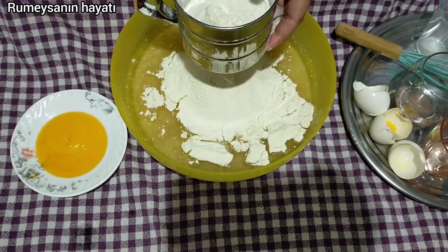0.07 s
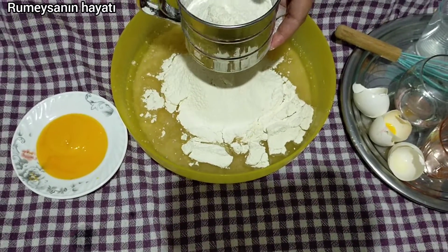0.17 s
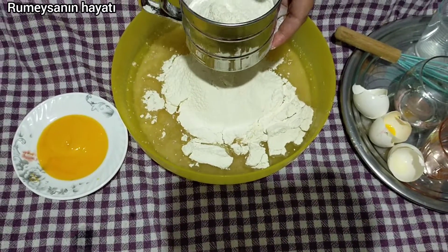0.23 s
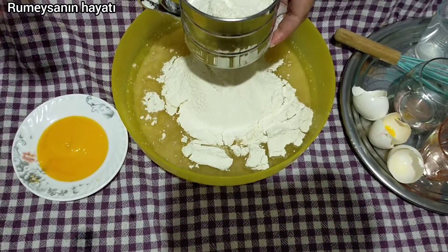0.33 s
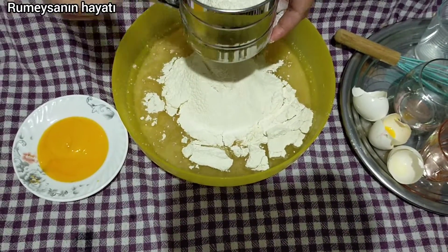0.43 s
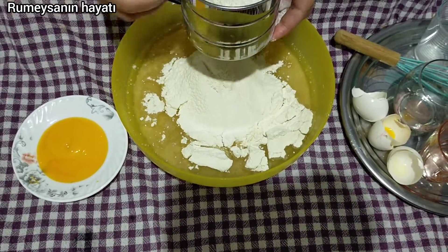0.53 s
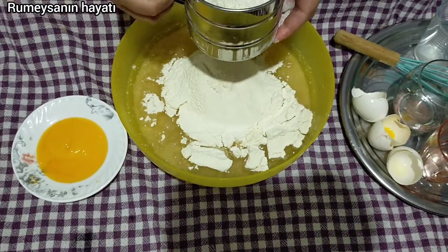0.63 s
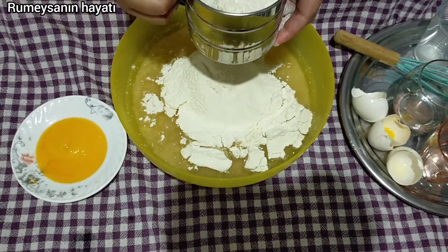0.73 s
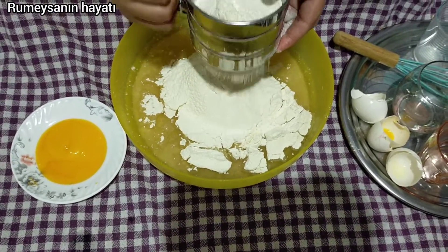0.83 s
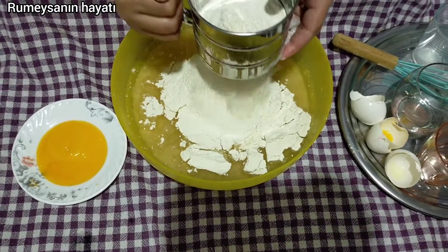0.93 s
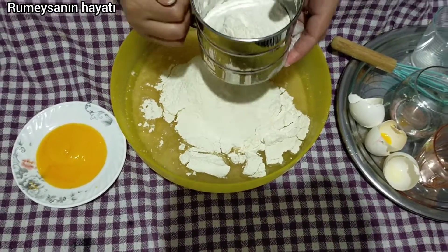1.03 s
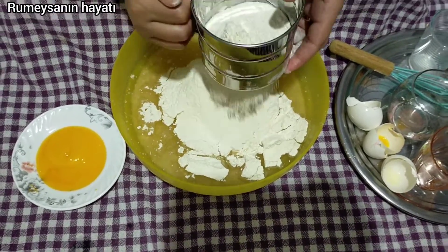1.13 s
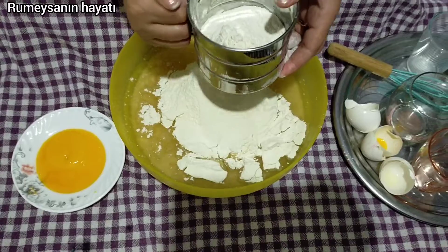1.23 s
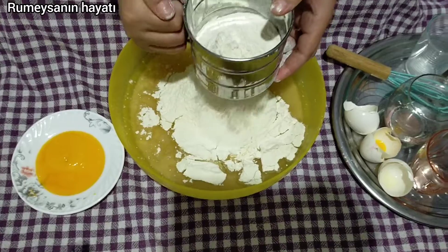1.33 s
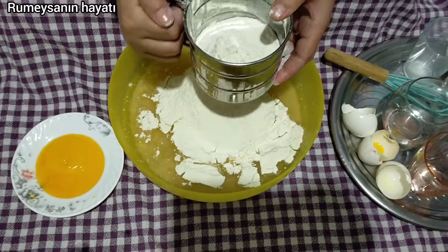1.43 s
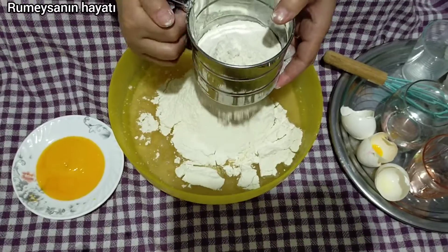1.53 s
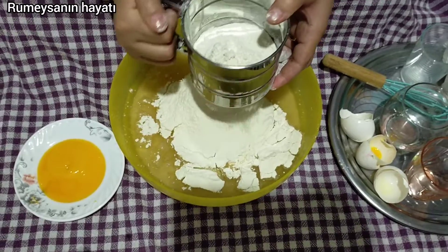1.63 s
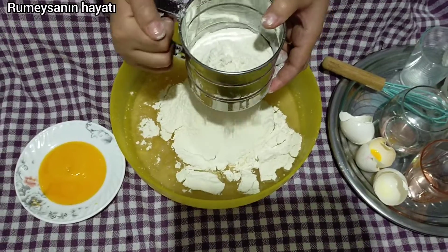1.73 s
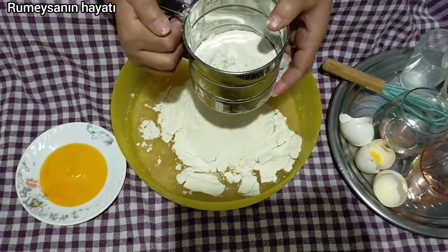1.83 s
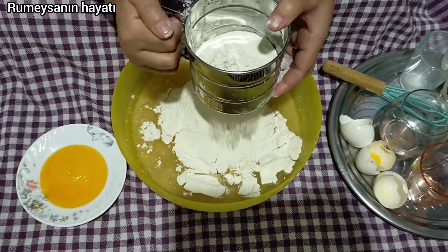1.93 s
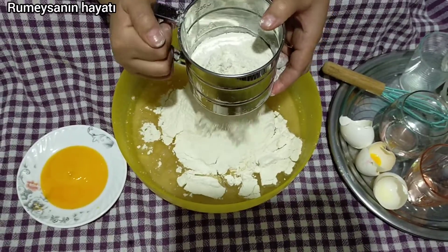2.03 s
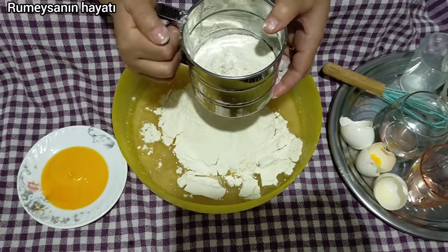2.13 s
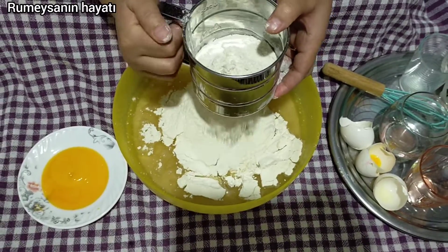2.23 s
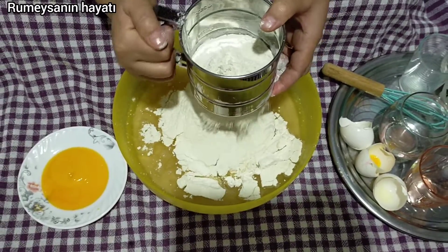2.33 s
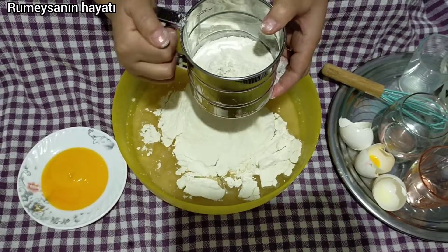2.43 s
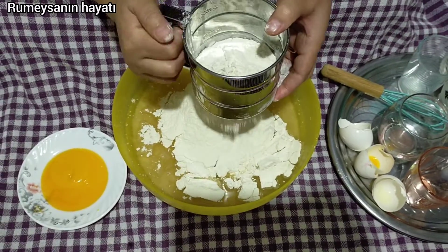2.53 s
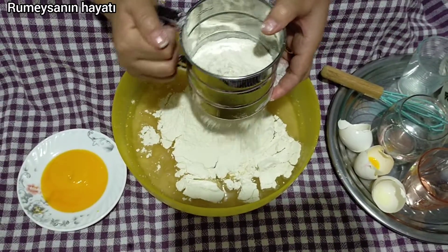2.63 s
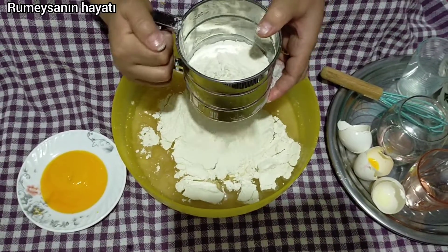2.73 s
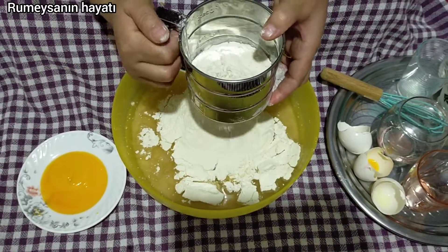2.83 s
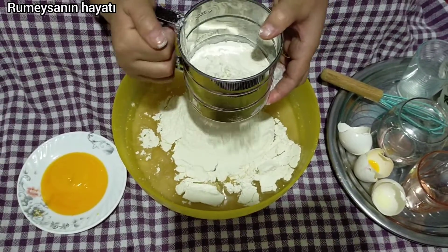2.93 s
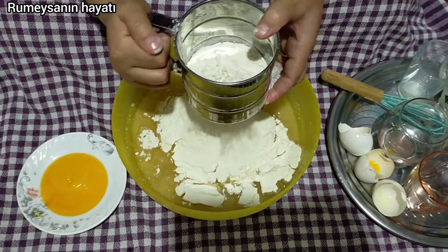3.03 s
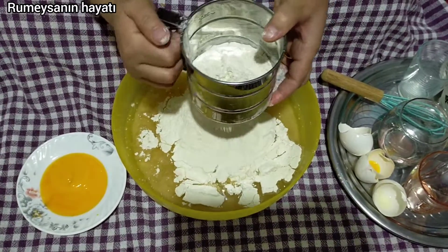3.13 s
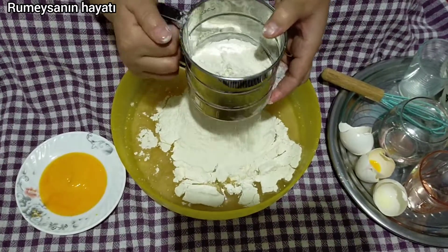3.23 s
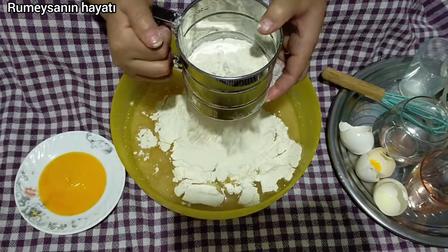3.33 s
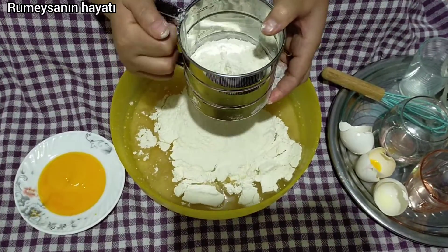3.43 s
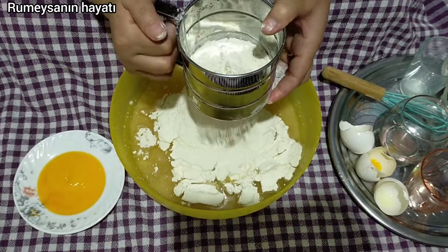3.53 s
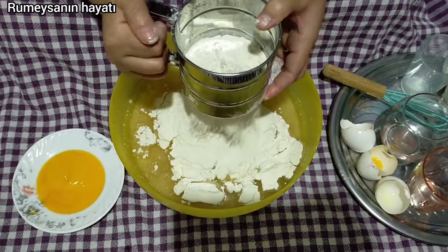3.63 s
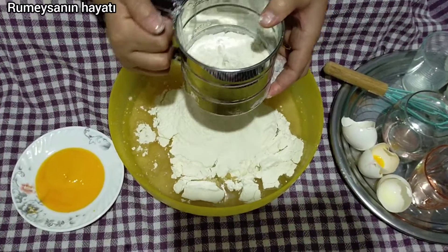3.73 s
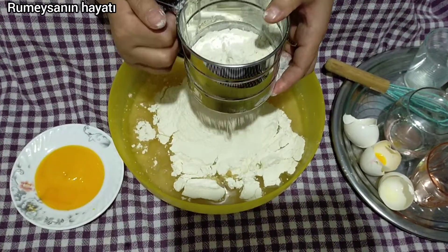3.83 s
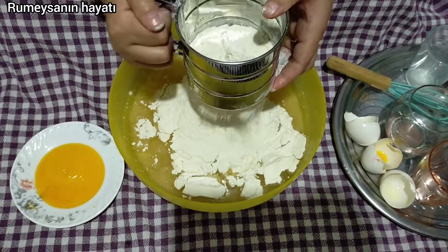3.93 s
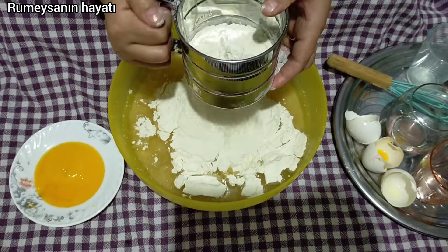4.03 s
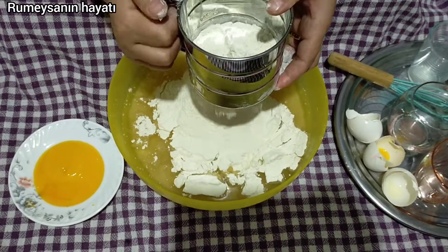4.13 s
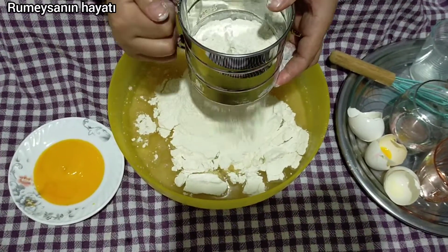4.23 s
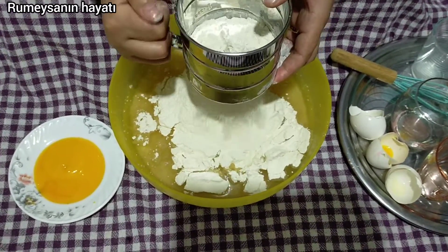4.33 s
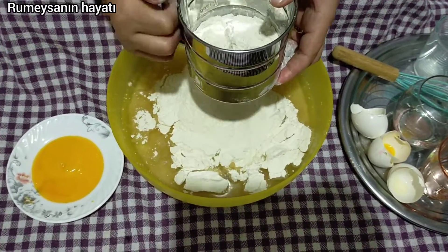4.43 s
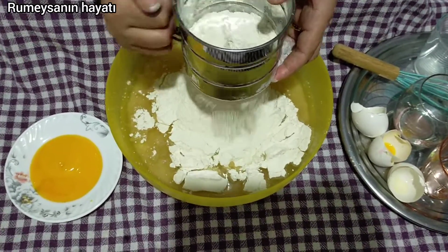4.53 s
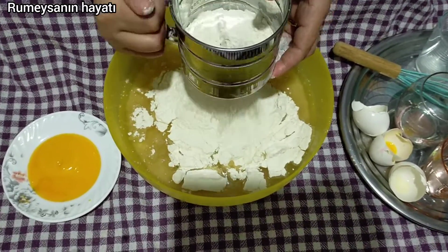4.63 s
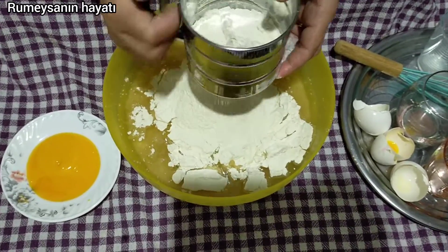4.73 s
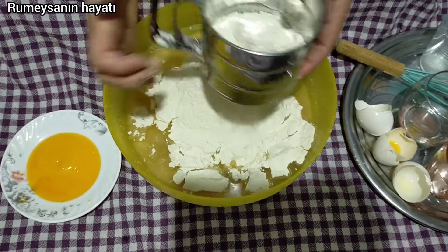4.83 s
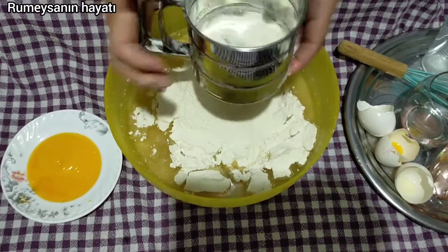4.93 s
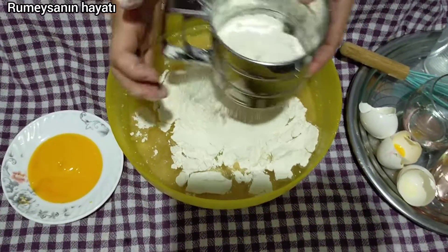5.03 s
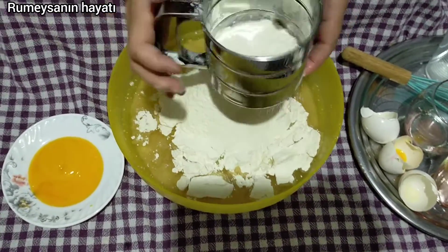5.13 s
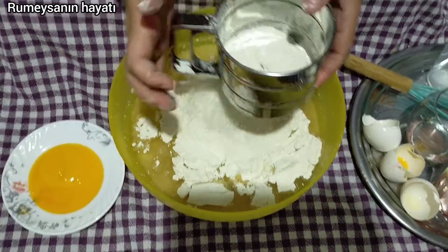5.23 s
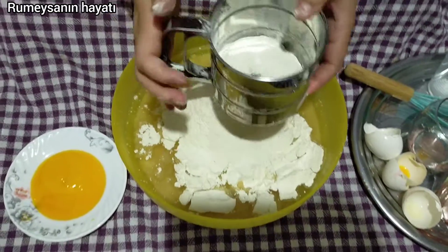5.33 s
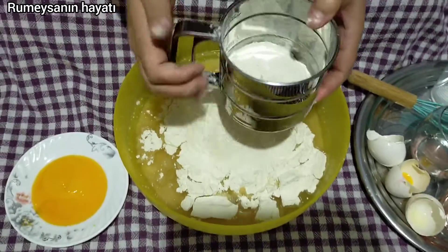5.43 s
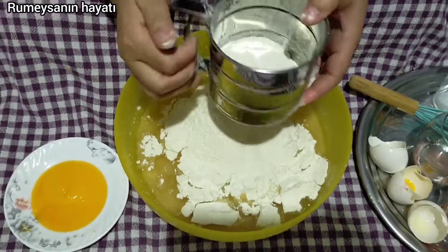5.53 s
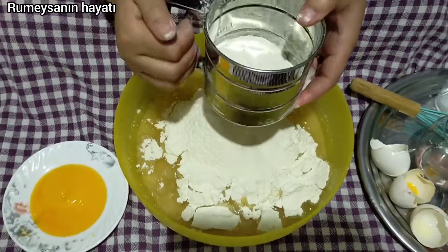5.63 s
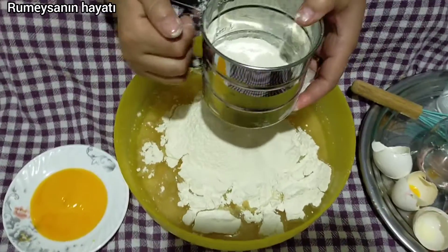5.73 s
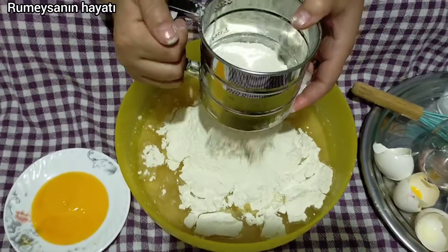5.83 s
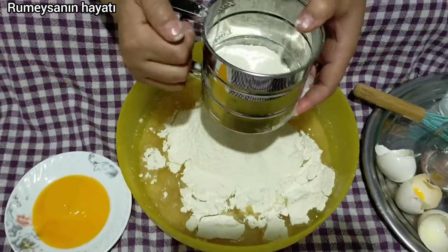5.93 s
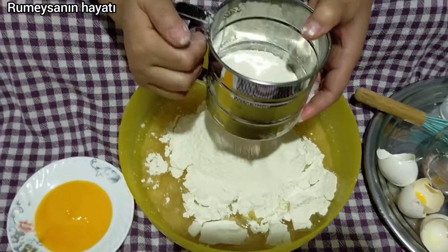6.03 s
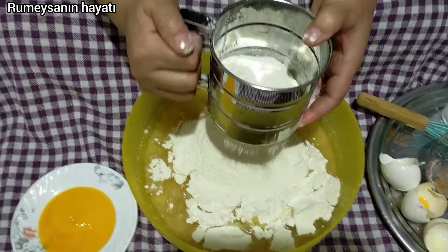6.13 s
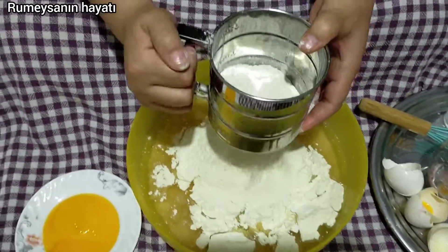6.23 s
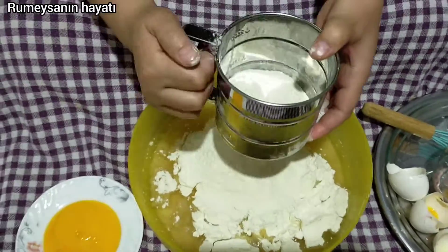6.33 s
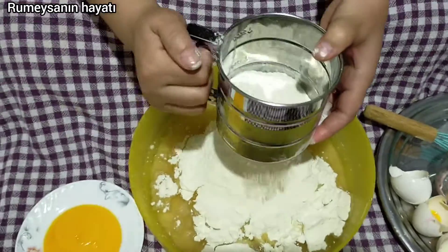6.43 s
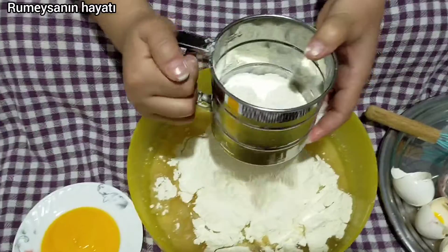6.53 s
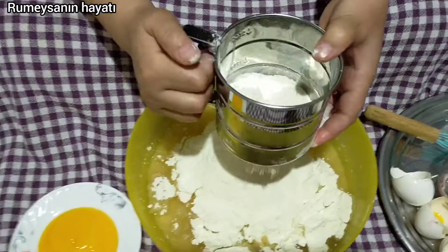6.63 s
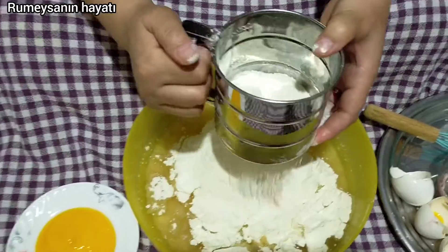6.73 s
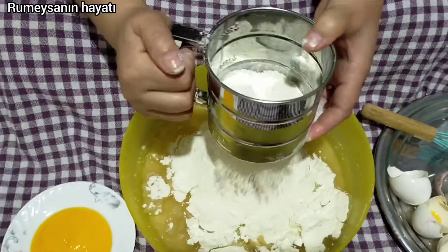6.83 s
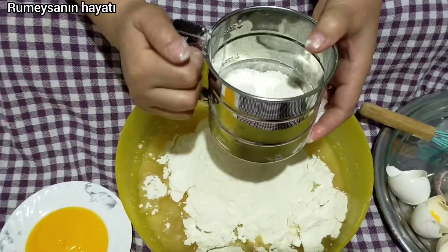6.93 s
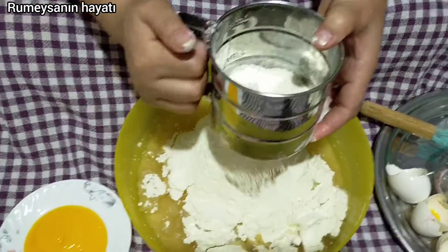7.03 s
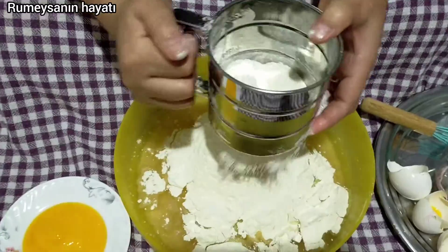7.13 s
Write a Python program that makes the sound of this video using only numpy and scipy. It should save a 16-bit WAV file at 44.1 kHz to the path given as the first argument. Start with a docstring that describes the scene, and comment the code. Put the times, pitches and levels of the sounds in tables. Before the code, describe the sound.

Close up in a small kitchen, fingers faintly knock and rub a steel flour sifter. Then the handle is squeezed about three times a second, each squeeze a sharp click and short gritty rasp of blades on wire mesh, each spring return softer. The rhythm stops for about a second with a few loose ticks, then resumes with snappier returns. Short wall echoes and a quiet low hum with soft hiss surround it.

```python
"""Fingers knock, rub and squeak faintly on a steel flour sifter in a small kitchen, over a low hum.
Then each squeeze of the handle clicks the lever and whips blades across the wire mesh with a rasp;
the spring drags them back more softly. The hand lets go once and the loose handle ticks.
Tiny random friction slips ring the steel parts, and wall echoes follow. The hum is a few low tones,
over filtered-noise rumble and hiss."""
import sys
import numpy as np
from scipy import signal
from scipy.fft import rfft, irfft, next_fast_len
from scipy.io import wavfile
from scipy.ndimage import uniform_filter1d

SR = 44100
rng = np.random.default_rng(int(sys.argv[2]) if len(sys.argv) > 2 else 0)


def unload_audio(sound):
    """Save the sound as a 16-bit wav file, at the path given as the first command line argument."""
    columns = np.transpose(np.atleast_2d(sound))
    # keep every value between -1 and 1, then stretch to whole-number steps
    steps = np.round(np.clip(columns, -1, 1) * 32767)
    wavfile.write(sys.argv[1], SR, steps.astype(np.int16))


N = 316197
TIME = np.arange(N) / SR   # seconds

# Squeezes click the lever, then whip the blades round: click_s, click_level_db, run_up_to_top_speed_s, rasp_level_db
SQUEEZES = [(0.841, -38, 0.052, -34.5), (1.287, -35.5, 0.028, -35), (1.661, -40.5, .028, -38),
            (2.002, -41, 0.031, -36.5), (2.329, -38, 0.026, -35.5), (2.647, -37.5, 0.026, -36),
            (2.964, -34, 0.027, -35.5), (3.294, -32, 0.025, -36), (3.617, -34, 0.025, -36.5),
            (3.942, -30.5, 0.026, -36.5), (4.261, -32, .026, -35.5), (4.557, -28.5, 0.021, -33.5),
            (5.809, -40.5, 0.039, -40.5), (6.162, -34, .026, -35), (6.476, -37.5, .028, -35.5),
            (6.805, -36.5, 0.03, -36), (7.126, -34.5, 0.031, -36)]
# The spring drags lever and blades back: click_s, click_level_db, run_up_to_top_speed_s, rasp_level_db
RETURNS = [(1.065, -69, 0.057, -47), (1.506, -54, 0.042, -47), (1.863, -43.5, 0.03, -44.5),
           (2.179, -52, 0.032, -44), (2.519, -49, 0.033, -44.5), (2.839, -48, 0.032, -45),
           (3.135, -41.5, 0.035, -44), (3.487, -49, 0.033, -44), (3.803, -53, 0.036, -44.5),
           (4.131, -40.5, 0.031, -43), (4.445, -36.5, 0.039, -44), (4.743, -50, .036, -42),
           (6.012, -40.5, 0.036, -45.5), (6.357, -49, 0.038, -42.5), (6.674, -53, 0.042, -41.5),
           (6.987, -47.5, 0.033, -42.5)]
# The slack linkage ticks just before some strokes: start_s, level_db
SLACK_TICKS = [(1.648, -49), (1.848, -56), (2.167, -50), (2.502, -53), (3.113, -49), (3.782, -57),
               (4.428, -46.5)]
# With the new grip the returning lever snaps against its stop: start_s, level_db
STOP_SNAPS = [(6.061, -32), (6.404, -25), (6.722, -37), (7.033, -31)]
# The loose handle ticks as the grip shifts: start_s, level_db
HANDLE_TICKS = [(5.004, -38.5), (5.198, -44), (5.378, -51)]
# Dry pivots squeak briefly: middle_s, mean_pitch_hz, peak_level_db, half_length_s
SQUEAKS = [(0.137, 1790, -63, 0.0034), (0.196, 2270, -66.5, 0.0084), (0.212, 5550, -74, 0.012),
           (0.904, 1462, -35.5, 0.0026)]
# Fingers knock on the cup: start_s, level_db
FINGER_KNOCKS = [(.048, -48.5), (.277, -45.5), (.621, -51)]
# The hand slides over cup and handle: middle_s, level_db, half_length_s
RUBS = [(0.0, -51, .02), (0.133, -64.5, 0.016), (5.123, -66.5, 0.11)]

# Ringing of the cup, damped by flour and hand: pitch_hz, width_hz, relative_level_db
CUP_MODES = [(322, 46, -18), (489, 73, -7), (645, 223, -3), (781, 120, 4), (907, 96, -0.5), (1117, 152, -4),
             (1347, 295, -6.5), (1563, 210, -4.5), (1735, 197, -5.5), (2077, 164, -9), (2300, 180, -12),
             (2930, 685, -18), (4170, 176, -24)]
# Ringing of mesh and wire linkage: pitch_hz, width_hz, relative_level_scraped_db, relative_level_clicked_db
WIRE_MODES = [(6510, 930, 0, -3.5), (7280, 920, 8, 4.5), (8135, 1240, 3, -2), (9660, 530, 3, 2),
              (10000, 4200, -3.5, -1.5), (13000, 540, 2, 1), (14740, 440, -2, -7)]
# Ringing of the free handle: pitch_hz, width_hz, relative_level_db
HANDLE_MODES = [(1450, 200, -6), (1880, 90, 3), (2150, 200, -4), (3000, 500, -19)]
# Ringing of the cup's wall under a finger: pitch_hz, width_hz, relative_level_db
WALL_MODES = [(345, 38, 4), (674, 140, 4.5), (1073, 145, 11), (1580, 240, -3.5), (1770, 220, -4),
              (2450, 79, 0.5)]
# Tone colour of skin on steel: frequency_hz, relative_level_per_hz_db
SKIN_COLOUR = [(100, -27), (330, -10), (700, -9), (1100, -10.5), (1600, -6.5), (2600, -16.5), (3800, -22.5),
               (5500, -33), (7800, -24), (10000, -42), (16000, -39)]

# Echoes against direct sound: frequency_hz, level_db
ECHO_LEVELS = [(200, -15), (800, -10.5), (1200, -7), (2000, 0.5), (3000, 6), (4500, 0), (7500, -11),
               (10000, -10.5), (16000, -8)]
# Time for echoes to fall by 60 dB: frequency_hz, decay_s
ECHO_DECAYS = [(200, 0.49), (1500, 0.29), (4000, 0.27), (8000, 0.24), (15000, .22)]
# Tones of the low hum: pitch_hz, mean_level_db
HUM_TONES = [(55.8, -60), (42, -71.5), (80.7, -75.5), (108.5, -77.5), (138.6, -84.5)]
# Tone colour of the rumble: frequency_hz, relative_level_per_hz_db
RUMBLE_COLOUR = [(8, -1.5), (16, -3.5), (30, -7.5), (70, -12.5), (100, -27), (250, -47), (1000, -84)]
# Tone colour of the room's soft hiss: frequency_hz, relative_level_per_hz_db
HISS_COLOUR = [(60, -27), (100, -7), (170, -9), (260, -11.5), (390, -9), (520, -14.5), (800, -13),
               (1400, -16.5), (2400, -24), (4500, -36), (6200, -37), (7900, -30), (9500, -36.5),
               (16000, -36)]

# How long each kind of contact chatters before it settles, in seconds
SQUEEZE_CHATTER_S, RETURN_CHATTER_S, SLACK_CHATTER_S, STOP_CHATTER_S = 0.0047, 0.0038, 0.0035, 0.0017
HANDLE_CHATTER_S, KNOCK_CHATTER_S = 0.004, 0.0023
CUP_DB = -1.5   # the loosened cup's ring against the mesh's hiss
PACKED_DB, LOOSEN_S = -3.5, 0.85   # packed flour muffles the cup until the first strokes loosen it
SQUEAK_WAVER = 0.0237   # typical share by which a squeak's pitch wavers
HISS_DB, RUMBLE_DB = -64.5, -60
CUTOFF_HZ = 16100


def blades():
    """Blades rasp on the mesh: its wires hiss and the cup rings hollow."""
    squeeze = sweeps(SQUEEZES, whip_share=0.1, lead_db=-8.0, lead_share=0.6, coast_s=0.0066, take_up_s=0.0051)
    back = sweeps(RETURNS, whip_share=0.19, lead_db=-10.5, lead_share=0.97, coast_s=0.0057, take_up_s=0.0047)
    rasp = (squeeze + back) * slips(per_s=6000, spread_db=4.0, judder_db=0.5, judder_rate=550)
    packed = np.exp(-np.maximum(TIME - SQUEEZES[0][0], 0) / LOOSEN_S)
    cup_gain = from_db(CUP_DB + PACKED_DB * packed)
    cup = cup_gain * shifting_body(rasp, CUP_MODES, shift_db=2.5, shift_rate=100)
    scraped_modes = [(hz, width, db) for hz, width, db, _ in WIRE_MODES]
    mesh = shifting_body(rasp, scraped_modes, shift_db=1.5, shift_rate=150)
    # thin wires radiate little bass
    return cup + high_pass(mesh, 2700, order=2)


def sweeps(strokes, whip_share, lead_db, lead_share, coast_s, take_up_s):
    """Drive of the blades: they creep at first, whip through their top speed and coast to rest."""
    drive = np.zeros(N)
    for click_s, _, run_up, db in strokes:
        top_s = click_s + run_up
        middle = int(top_s * SR)
        near = slice(middle - SR // 10, middle + SR // 10)
        t = TIME[near] - top_s
        # a slow stroke has a longer run-up and a broader peak
        whip_width = whip_share * (run_up + 0.024)
        whip = np.exp(-0.5 * np.abs(t / whip_width) ** 3)
        creep_width = np.where(t < 0, lead_share * run_up, coast_s)
        creep = from_db(lead_db) * np.exp(-0.5 * (t / creep_width) ** 2)
        # the linkage takes up its play just before the click
        engaged = np.exp(np.minimum(t + run_up, 0) / take_up_s)
        drive[near] += from_db(db) * np.hypot(whip, creep * engaged)
    return drive


def slips(per_s, spread_db, judder_db, judder_rate):
    """Friction: tiny slips of uneven size that bunch as the metal catches and lets go."""
    sizes = from_db(spread_db * np.minimum(rng.exponential(1, N), 3))
    signs = rng.choice([-1, 1], N)
    happens = rng.random(N) < per_s / SR
    force = sizes * signs * happens * from_db(judder_db * drift(judder_rate))
    # the hand keeps the mean force steady, averaged over 400 samples
    return force / np.sqrt(uniform_filter1d(force ** 2, size=400) + 1e-6)


def shifting_body(force, modes, shift_db, shift_rate):
    """As the blades and the grip move, each mode is driven now more, now less."""
    tap = signal.unit_impulse(SR // 10)
    out, answer = 0, 0
    for k, (hz, width, db) in enumerate(modes):
        gain = (-1) ** k * from_db(db)
        shifted = force * from_db(shift_db * drift(shift_rate))
        out = out + gain * resonate(shifted, hz, width)
        answer = answer + gain * resonate(tap, hz, width)
    return out / np.linalg.norm(answer)


def lever():
    """The lever clicks with every stroke, in its slack and at its stop; little of it reaches the cup."""
    kinds = [(SQUEEZES, SQUEEZE_CHATTER_S), (RETURNS, RETURN_CHATTER_S),
             (SLACK_TICKS, SLACK_CHATTER_S), (STOP_SNAPS, STOP_CHATTER_S)]
    force = sum(contacts(rows, chatter_s, settle_s=0.0013, press_s=0.0005) for rows, chatter_s in kinds)
    return linkage(force) + from_db(-15.5) * body(force, CUP_MODES)


def contacts(rows, chatter_s, settle_s, press_s):
    """Each contact presses in, chatters for a moment, then settles."""
    level, t = np.zeros(N), TIME[:SR // 10]
    press = 1 - np.exp(-t / press_s)
    settle = np.exp(-np.maximum(t - chatter_s, 0) / settle_s)
    shape = press * settle
    for start_s, db, *_ in rows:
        start = int(start_s * SR)
        level[start:start + len(shape)] += from_db(db) * shape[:N - start]
    return level * slips(per_s=17000, spread_db=-1.0, judder_db=-3.0, judder_rate=1600)


def linkage(force):
    """The bright ring of the wire linkage, a little different at each click."""
    clicked_modes = [(hz, width, db) for hz, width, _, db in WIRE_MODES]
    ring = shifting_body(force, clicked_modes, shift_db=2.0, shift_rate=15)
    return high_pass(ring, 3600, order=2)


def handle():
    """Out of the fist, the handle rings along with the linkage."""
    force = contacts(HANDLE_TICKS, HANDLE_CHATTER_S, settle_s=0.0018, press_s=0.0005)
    return linkage(force) + from_db(-6.5) * body(force, HANDLE_MODES)


def squeaks():
    """Steel sticks and slips at a nearly steady pitch for a moment."""
    out = 0
    for middle_s, hz, db, length in SQUEAKS:
        pitch = hz * (1 + SQUEAK_WAVER * drift(500))
        swell = np.exp(-0.5 * ((TIME - middle_s) / length) ** 2)
        out = out + from_db(db) * swell * np.sin(2 * np.pi * np.cumsum(pitch) / SR)
    return out


def fingers():
    """Dull knocks ring the cup's wall; rubs of skin on steel swell and fade."""
    pressure = sum(from_db(db) * np.exp(-0.5 * ((TIME - middle_s) / length) ** 2)
                   for middle_s, db, length in RUBS)
    rub = pressure * slips(per_s=3700, spread_db=-3.5, judder_db=-3.0, judder_rate=100)
    knocks = contacts(FINGER_KNOCKS, KNOCK_CHATTER_S, settle_s=0.0027, press_s=0.00057)
    return colour(rub, SKIN_COLOUR) + body(knocks, WALL_MODES)


def sifter(rooms):
    """The sifter close by, with its echoes; handle, pivots and fingers stay in place."""
    moving = blades() + lever()
    still = handle() + squeaks() + fingers()
    moving_echoes = moving_paths(moving, rooms, rate=130)
    still_echoes = signal.oaconvolve(still, rooms[0])[:N]
    return moving + still + moving_echoes + still_echoes


def moving_paths(x, responses, rate):
    """The blades race round the mesh, so their sound reaches the walls by quickly changing sets of paths."""
    weights = np.array([drift(rate) for _ in responses])
    weights /= np.linalg.norm(weights, axis=0)
    return sum(signal.oaconvolve(x * w, response)[:N] for w, response in zip(weights, responses))


def kitchen(first_echo_s, build_s):
    """Dense wall echoes of one click, built from noise bands that die at their own rates."""
    t, edges = TIME[:SR // 2], np.geomspace(150, 17000, 15)   # bands about half an octave wide
    swell = 1 - np.exp(-np.maximum(t - first_echo_s, 0) / build_s)
    echoes = 0
    for low, high in zip(edges, edges[1:]):
        hz = np.sqrt(low * high)
        decay = from_db(-60 * t / at_hz(ECHO_DECAYS, hz))
        tail = rng.standard_normal(len(t)) * swell * decay
        band = signal.sosfilt(signal.butter(2, [low, high], "band", fs=SR, output="sos"), tail)
        # a wider band carries more energy
        band_size = np.sqrt(2 * (high - low) / SR)
        echoes = echoes + from_db(at_hz(ECHO_LEVELS, hz)) * band / np.linalg.norm(band) * band_size
    return echoes


def two_ports(x, side_db, above_hz, flicker_rate):
    """The bass is alike in both channels; the treble flickers between them."""
    side = high_pass(x * drift(flicker_rate), above_hz, order=8)
    return x + from_db(side_db) * side * [[1], [-1]]


def background():
    """A low hum whose tones waver slightly, over rumble and a soft hiss made from noise."""
    hum = 0
    for hz, db in HUM_TONES:
        level = from_db(db + 0.6 * drift(1)) * np.sqrt(2)   # root two turns average level into peak
        hum = hum + level * np.sin(2 * np.pi * hz * TIME + 0.3 * drift(3.5))
    rumble = from_db(RUMBLE_DB) * colour(rng.standard_normal(N), RUMBLE_COLOUR)
    hiss = from_db(HISS_DB) * colour(rng.standard_normal(N), HISS_COLOUR)
    return hum + rumble + hiss


def body(force, modes):
    """Modes ring side by side with alternating sign; a white force keeps its power."""
    tap = signal.unit_impulse(SR // 10)
    answer = sum((-1) ** k * from_db(db) * resonate(tap, hz, width)
                 for k, (hz, width, db) in enumerate(modes))
    return signal.oaconvolve(force, answer / np.linalg.norm(answer))[:N]


def resonate(x, hz, width_hz):
    """One resonance with gain 1 at its peak; a wider one dies sooner."""
    r = np.exp(-np.pi * width_hz / SR)
    top = np.array([1, 0, -1]) * (1 - r * r) / 2
    bottom = [1, -2 * r * np.cos(2 * np.pi * hz / SR), r * r]
    return signal.lfilter(top, bottom, x + 1e-18)


def colour(x, spectrum):
    """Shape the tone by a spectrum; white noise keeps its power."""
    size = next_fast_len(N)
    gain = rms_one(from_db(at_hz(spectrum, np.fft.rfftfreq(size, 1 / SR))))
    return irfft(rfft(x, size) * gain, size)[:N]


def high_pass(x, hz, order):
    """Take away what lies below an edge."""
    return signal.sosfilt(signal.butter(order, hz, "high", fs=SR, output="sos"), x + 1e-18)


def drift(rate):
    """Random wandering of spread 1, joining `rate` random points per second."""
    knots = rng.standard_normal(N // 20)
    return rms_one(np.interp(TIME * rate, np.arange(len(knots)), knots))


def at_hz(points, hz):
    """Read a table between its rows on a log-frequency axis."""
    known_hz, value = np.transpose(points)
    return np.interp(np.log(hz + 1e-3), np.log(known_hz), value)


def rms_one(x):
    """Scale to an average power of 1."""
    return x / np.sqrt(np.mean(x ** 2) + 1e-20)


def from_db(db):
    """Turn decibels into gain."""
    return 10 ** (np.asarray(db) / 20)


def scene():
    """The sifter in the kitchen, over the room's own sound."""
    rooms = [kitchen(first_echo_s=0.0056, build_s=0.0024) for _ in range(6)]
    near = two_ports(sifter(rooms), side_db=-11.5, above_hz=4200, flicker_rate=900)
    return near + background()


def record(dry):
    """The top of the treble is cut steeply."""
    return signal.sosfilt(signal.ellip(10, 0.2, 70, CUTOFF_HZ, fs=SR, output="sos"), dry)


dry = scene()
out = record(dry)
unload_audio(out)
```